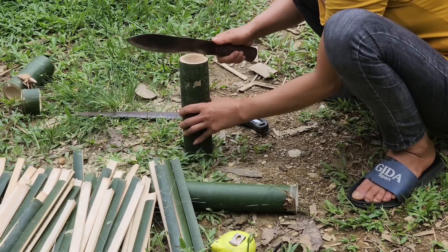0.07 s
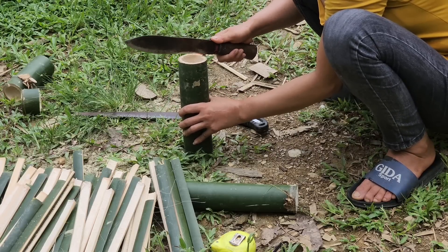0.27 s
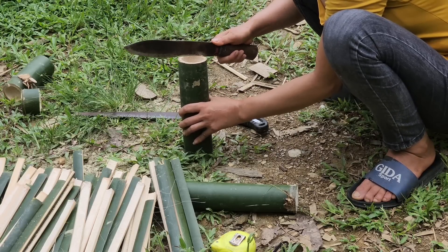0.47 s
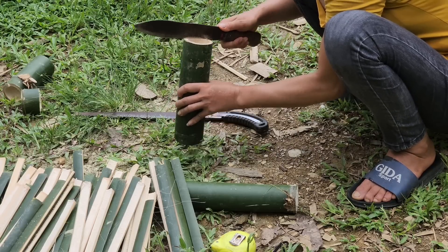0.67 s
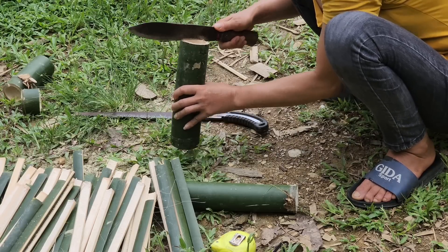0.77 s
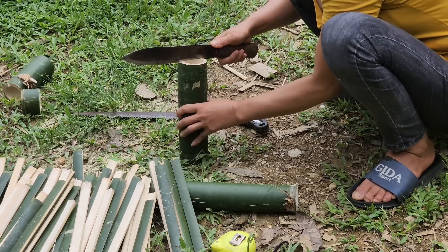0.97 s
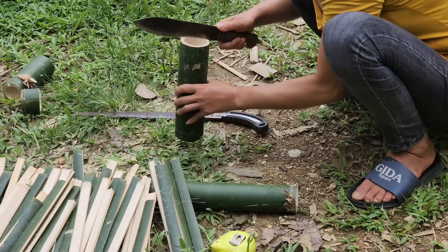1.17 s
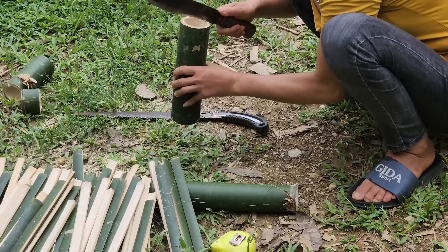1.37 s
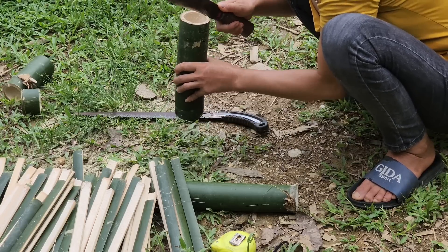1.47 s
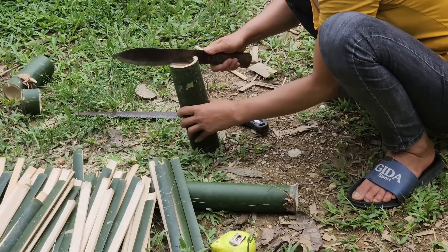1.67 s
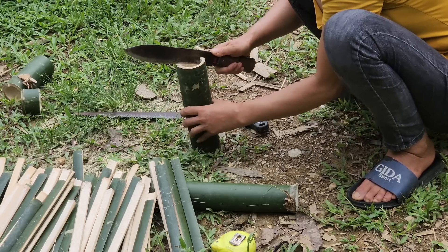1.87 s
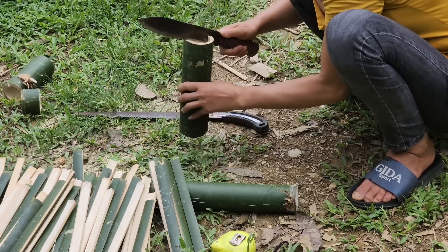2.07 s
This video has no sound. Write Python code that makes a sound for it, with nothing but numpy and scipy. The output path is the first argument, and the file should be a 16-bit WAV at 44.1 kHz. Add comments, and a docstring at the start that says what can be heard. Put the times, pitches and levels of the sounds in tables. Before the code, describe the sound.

Two brief bamboo knocks under a second apart: a soft, steely tap with grass brush, then a hard, hollow whack with low thud. Stereo, close, open grassy yard, constant faint insect buzz and low hum.

```python
"""Bamboo and machete knocked on the ground

A machete set on the end of an upright bamboo tube is lifted with it and brought down on the soil twice,
the second time harder. Each knock is a quick cluster of contacts: damped sines for the ringing wall, the steel
and the thudding ground, noise bursts for cracking fibres; at the harder one the hollow of the tube pops.
Sliding tones and filtered noise make insects trill and buzz in the grass around, over a faint low hum."""
import sys
import numpy as np
from scipy import signal
from scipy.fft import rfft, irfft, next_fast_len
from scipy.io import wavfile
from scipy.ndimage import map_coordinates

SR = 44100
rng = np.random.default_rng(int(sys.argv[2]) if len(sys.argv) > 2 else 0)


def generate_wav(signal):
    """Clip the signal to [-1, 1] and save it as 16-bit WAV at the path in sys.argv[1]."""
    frames = np.transpose(np.atleast_2d(signal))
    scaled = np.clip(frames, -1, 1) * 32767
    pcm = np.round(scaled).astype(np.int16)
    wavfile.write(sys.argv[1], SR, pcm)


N = 93447  # samples, about 2.1 s

# Blade against bamboo. Each row: time in seconds, wall level in dB, wall tilt in dB per octave,
# steel level in dB, crack level in dB, crack tilt in dB per octave, crack t60 in seconds.
CONTACTS = [(0.872, -30.5, 12, -51, -28.5, -2, 0.022), (0.8749, -34, 6.5, -29.5, -33, -3, 0.017),
            (0.8758, -51, 7, -22.5, -24, -0.5, 0.009), (0.8862, -52, 2, -58, -39, 3.5, .04),
            (1.6016, -32, 12.5, -56, -33, 0, .03), (1.6067, -2, -4, -20, -16, 2.5, 0.046),
            (1.6133, -13, 2, -37, -17.5, 9, .022), (1.6186, -15.5, -20, -41, -26.5, -2.5, .014)]
# Colour of cracking fibres and brushed grass. Each row: frequency in Hz, relative density in dB per Hz.
FIBRE_COLOUR = [(150, 2.5), (310, -1), (420, -12), (750, -3.5), (1150, 3), (1650, 1), (2200, 3), (3000, -2),
                (3800, 0), (5500, 2.5), (7000, -3.5), (10000, -3.5), (12500, -9), (16000, -16)]
# Likeness of the two channels for close noises. Each row: frequency in Hz, left-right correlation.
NOISE_LIKENESS = [(300, 0.9), (1400, 0.73), (3100, 0.12), (6800, -0.16), (15000, -0.084)]
KEYNOTE_HZ = 1138  # the wall's strongest mode, and the pivot of all tilts


def amp(db):
    """Decibels to gain."""
    return 10 ** (np.asarray(db) / 20)


def unit(x):
    """Scaled to rms 1."""
    return x / np.sqrt(np.mean(x ** 2) + 1e-20)


def along(points, hz):
    """Values between (Hz, value) points on a log frequency axis."""
    f, v = np.transpose(points)
    return np.interp(np.log(hz + 1), np.log(f + 1), v)


def wobble(rate):
    """A smooth random curve, rate knots a second."""
    knots = rng.standard_normal(int(N * rate / SR) + 4)
    return map_coordinates(knots, [np.arange(N) * rate / SR])


def filtered(x, response):
    """x times a complex response of frequency."""
    m = next_fast_len(N + SR // 2)
    return irfft(rfft(x, m) * response(np.fft.rfftfreq(m, 1 / SR)), m)[..., :N]


def pan(db):
    """Left and right gains for a left-minus-right level difference in dB."""
    return amp(np.array([[.5], [-.5]]) * db)


def noise(spectrum, likeness):
    """Coloured stereo noise of rms 1; the mid-side balance sets the left-right correlation."""
    def mid_side(hz):
        angle = np.arccos(np.clip(along(likeness, hz), -1, 1)) / 2
        return amp(along(spectrum, hz)) * [np.cos(angle), np.sin(angle)]

    mid, side = filtered(rng.standard_normal((2, N)), mid_side)
    return unit(np.array([mid + side, mid - side]))


def since(s):
    """Seconds since s, zero before it."""
    return np.maximum(np.arange(N) / SR - s, 0)


def decay(t, t60):
    """Exponential decay by 60 dB in t60 seconds."""
    return np.exp(-np.log(1000) * t / t60)


def strike(t, attack, t60, hold=0):
    """Attack, hold and exponential release, cut off 120 dB down."""
    release = decay(np.clip(t - hold, 0, 2 * t60), t60)
    return (1 - np.exp(-t / attack)) * release * (t < hold + 2 * t60)


def ring(s, hz, attack, t60):
    """One damped mode set going at s."""
    start = int(s * SR)
    end = min(N, start + SR // 4)
    t = np.maximum(np.arange(start, end) / SR - s, 0)
    mode = strike(t, attack, t60) * np.sin(2 * np.pi * hz * t)
    return np.pad(mode, (start, N - end))


def tone(hz):
    """A sine that starts anywhere in its cycle."""
    return np.sin(2 * np.pi * (hz * since(0) + rng.random()))


def slide(s, length, hz, fall_hz):
    """A soft-edged tone that slides down by fall_hz."""
    t = np.minimum(since(s), length)
    cycles = hz * t - fall_hz * t * t / (2 * length)
    return np.sin(np.pi * t / length) * np.sin(2 * np.pi * cycles)


def rumble():
    """Distant low rumble of coloured noise with a hum of wavering phase."""
    # Each row: time in seconds, hum rms level in dB before the 2 dB lift below.
    hum_levels = [(0.0, -60), (0.05, -57), (0.97, -58.5), (1.03, -64), (1.64, -57.5), (1.67, -64.5),
                  (2.12, -60.5)]
    # Each row: frequency in Hz, relative density in dB per Hz.
    rumble_colour = [(20, -5.5), (45, -5), (90, 1.5), (140, -1), (210, -9.5), (320, -13), (480, -11.5),
                     (800, -19), (2000, -51)]
    likeness = [(25, 0.35), (70, .92), (200, 0.91), (500, 0.39)]  # (Hz, left-right correlation)
    hum_hz, rumble_db = 51.5, -55.5

    level = amp(np.interp(np.arange(N) / SR, *np.transpose(hum_levels)))
    phase = 2 * np.pi * hum_hz * since(0) + 0.9 * wobble(6.6)
    hum = level * np.sqrt(2) * np.sin(phase)
    return hum * amp(2) + amp(rumble_db + 0.41 * wobble(5.77)) * noise(rumble_colour, likeness)


def crickets():
    """Trills of paired pulses and lone chirps, each a short tone sliding down."""
    # Each row: start in seconds, length in seconds.
    trills = [(0.434, .365), (1.438, .405)]
    # Each row: start in seconds, length in seconds, level in dB, start frequency in Hz, fall in Hz.
    chirps = [(0.047, 0.0285, -50, 4930, 450), (0.229, .04, -49.5, 4940, 850),
              (0.288, 0.031, -50, 4900, 550)]
    pairs_per_s, pair_gap_s, trill_db = 24.5, .012, -47.5  # the gap is from onset to onset
    pulse_s, pulse_hz, pulse_fall_hz = .013, 5060, 560

    out = sum(amp(db) * slide(s, length, hz, fall) for s, length, db, hz, fall in chirps)
    for start, length in trills:
        for s in start + np.arange(round(length * pairs_per_s)) / pairs_per_s:
            for gap in (0, pair_gap_s):
                # pulses differ a little in level and pitch
                level = amp(trill_db + rng.normal(0, 1))
                out = out + level * slide(s + gap, pulse_s, pulse_hz + rng.normal(0, 42), pulse_fall_hz)
    return out


def field():
    """Insects and leaves farther off: broad hiss, a narrow fluttering noise band and the crickets."""
    # Each row: frequency in Hz, relative density of the hiss in dB per Hz.
    hiss_colour = [(300, -24.5), (500, -4), (850, -8), (1300, -4.5), (2400, -6), (3200, -3.5), (4000, 0),
                   (4400, -1.5), (4680, 3.5), (5000, 0), (5500, 1.5), (6400, -5.5), (6850, -6.5),
                   (7300, -9.5), (8400, -6), (10500, -7.5), (11800, -15), (13000, -20), (15600, -26)]
    # Each row: frequency in Hz, left-right correlation.
    hiss_likeness = [(400, 0.43), (2000, 0.25), (4500, 0.34), (12000, 0.23)]
    # Each row: frequency in Hz, left minus right level in dB.
    field_pan = [(2500, 0), (4400, -2.5), (6500, -1.5), (8000, -0.5), (9300, -8.5), (10800, 0.5),
                 (12300, 1)]
    hiss_db, left_lead_s = -49.5, 0.0004677  # the left ear hears the field first
    buzz_hz, buzz_width_hz, buzz_db, flutter_db = 7550, 202, -54, 1

    def buzz_band(hz):
        return np.exp(-((hz - buzz_hz) / (2 * buzz_width_hz)) ** 2)

    def place(hz):
        lead = np.exp(1j * np.pi * hz * left_lead_s * np.array([[1], [-1]]))
        return pan(along(field_pan, hz)) * lead

    hiss = amp(hiss_db + 0.79 * wobble(7.4)) * noise(hiss_colour, hiss_likeness)
    band = filtered(noise([(buzz_hz, 0)], NOISE_LIKENESS), buzz_band)  # cut from white noise
    buzz = amp(buzz_db) * unit(band * amp(flutter_db * wobble(120)))
    return filtered(hiss + buzz + crickets(), place)


def yard(x):
    """Open ground: one dull echo and a thin, short tail of decaying noise."""
    # Each row: frequency in Hz, tail t60 in seconds.
    tail_t60 = [(100, 0.23), (600, 0.23), (1200, .15), (2500, 0.14), (5000, 0.26), (15000, 0.15)]
    tail_db, echo_s, echo_db, echo_hz = -15, .0285, -31, 1500  # echo_hz: treble falls above it

    hz, t, z = signal.stft(rng.standard_normal((2, SR // 2)), SR, nperseg=256)
    tail = signal.istft(z * decay(t, along(tail_t60, hz)[:, None]), SR, nperseg=256)[1]
    diffuse = signal.fftconvolve(x, tail / np.linalg.norm(tail[0]), axes=1)[:, :N]
    echo = filtered(x, lambda f: np.exp(-2j * np.pi * f * echo_s) / (1 + 1j * f / echo_hz))
    return amp(tail_db) * diffuse + amp(echo_db) * echo


def soil():
    """The tube's foot brushes the grass, thuds as damped low modes and settles in loose soil."""
    # Grass and soil brushed by the tube. Each row: start in seconds, level in dB, rise in seconds, t60 in seconds.
    brushes = [(0.863, -37.5, 0.0014, .05), (1.594, -39.5, 0.0045, 0.059)]
    # The tube settling. Each row: start in seconds, length in seconds, level in dB.
    settles = [(0.865, 0.25, -56.5), (1.63, 0.17, -54.5)]
    # Colour of the settling earth. Each row: frequency in Hz, relative density in dB per Hz.
    earth_colour = [(30, -13), (70, 4.5), (130, 1), (200, 1), (300, -4), (450, -4.5), (700, -15),
                    (2000, -34)]
    # The foot on the soil. Each row: time in seconds, level in dB, frequency in Hz, t60 in seconds.
    thud_modes = [(0.8733, -28, 300, .045), (0.8828, -28.5, 88, .05), (1.6063, -12.5, 185, .028),
                  (1.6118, -23, 95, .05)]
    low_cut_hz = 44.2  # the recorder's low cut, applied to the thuds: they fade below this

    brush = sum(amp(db) * strike(since(s), rise, t60, 2 * rise) for s, db, rise, t60 in brushes)
    settle = sum(amp(db) * np.sin(np.pi * np.minimum(since(s) / length, 1)) for s, length, db in settles)
    thuds = sum(amp(db) * ring(s, hz, attack=.001, t60=t60) for s, db, hz, t60 in thud_modes)
    thuds = filtered(thuds, lambda f: (1j * f / (low_cut_hz + 1j * f)) ** 2)
    return thuds + brush * noise(FIBRE_COLOUR, NOISE_LIKENESS) + settle * noise(earth_colour, NOISE_LIKENESS)


def hollow():
    """The air column pops as the blade sinks in, each pop one damped mode."""
    # Each row: time in seconds, level in dB, frequency in Hz, t60 in seconds.
    pops = [(1.6110, -25, 600, .045), (1.6213, -7.5, 630, .027)]
    return sum(amp(db) * ring(s, hz, attack=.0015, t60=t60) for s, db, hz, t60 in pops)


def fibres():
    """The edge bites in: a short burst of tiny snaps, grainy coloured noise, at each contact."""
    grain_db, grain_knots_per_s = 3.5, 2200
    attack_s, hold_s = 0.00019, 0.0029

    out = 0
    for s, *_, db, tilt, t60 in CONTACTS:
        colour = [(hz, level + tilt * np.log2(hz / KEYNOTE_HZ)) for hz, level in FIBRE_COLOUR]
        grain = amp(grain_db * wobble(grain_knots_per_s))
        snaps = unit(noise(colour, NOISE_LIKENESS) * grain)
        out = out + amp(db) * strike(since(s), attack_s, t60, hold_s) * snaps
    return out


def blade():
    """The steel, damped by the hand, gives a short clink of several modes at each contact."""
    # Each row: frequency in Hz, relative level in dB, t60 in seconds.
    steel_modes = [(3580, -2, 0.023), (3767, -3, 0.023), (4880, -8.5, 0.027), (5613, -10, 0.015),
                   (6770, -26, 0.015), (10700, -13, 0.029)]
    out = 0
    for hz, level, t60 in steel_modes:
        swing = sum(amp(db) * strike(since(s), 0.00024, t60) for s, _, _, db, *_ in CONTACTS)
        out = out + amp(level) * tone(hz) * swing
    return out


def wall():
    """Each contact pumps the same modes, in step with their swing; a glancing one favours the high ones."""
    # The modes above and below the keynote. Each row: frequency in Hz, level in dB re keynote, t60 in seconds.
    other_modes = [(825, -20.5, 0.011), (970, -25, 0.0195), (1204, -13.5, 0.038), (1396, -9, 0.034),
                   (1964, -12, 0.059), (2025, -7.5, 0.045), (2145, -19, 0.02), (2292, -13, .034),
                   (2390, -13, 0.034), (2688, -21, 0.023)]
    # the wall rings freely for a moment, then the wedged blade chokes it
    attack_s, free_s, choke_t60_s = 0.002, 0.0046, 0.024

    clocks = [since(s) for s, *_ in CONTACTS]
    pushes = [amp(db) * strike(t, attack_s, choke_t60_s, free_s) for t, (_, db, *_) in zip(clocks, CONTACTS)]
    out = 0
    for hz, level, t60 in [(KEYNOTE_HZ, 0, 0.037)] + list(other_modes):
        swing = 0
        for t, push, (_, _, tilt, *_) in zip(clocks, pushes, CONTACTS):
            tilt_gain = amp(tilt * np.log2(hz / KEYNOTE_HZ))
            swing = swing + push * tilt_gain * decay(np.minimum(t, 10 * t60), t60)
        out = out + amp(level) * swing * tone(hz)
    return out


def scene():
    """The two knocks in the open, slightly right of centre but for the soil, with the background."""
    tube = pan(-2.5) * (wall() + hollow())
    bite = pan(-2) * (fibres() + blade())
    knocks = tube + bite + soil()
    return knocks + yard(knocks) + field() + rumble()


def record(dry):
    """The loudest peaks are rounded off; nothing is kept above the band limit."""
    ceiling, top_hz = .85, 15950
    rounded = dry / (1 + (dry / ceiling) ** 6) ** (1 / 6)
    return filtered(rounded, lambda hz: hz < top_hz)


dry = scene()
out = record(dry)
generate_wav(out)
```